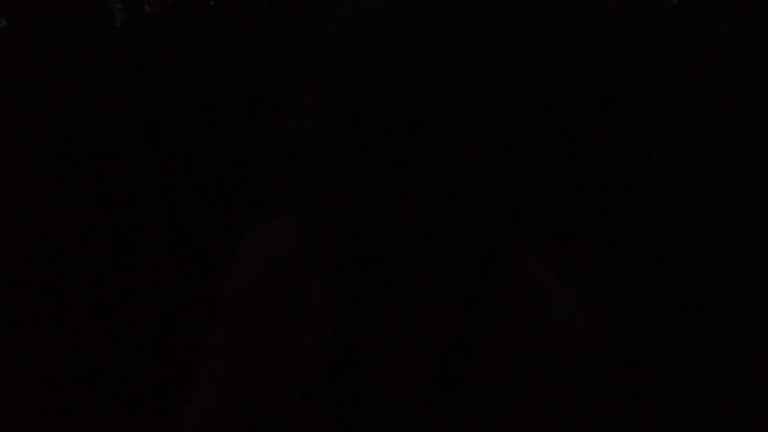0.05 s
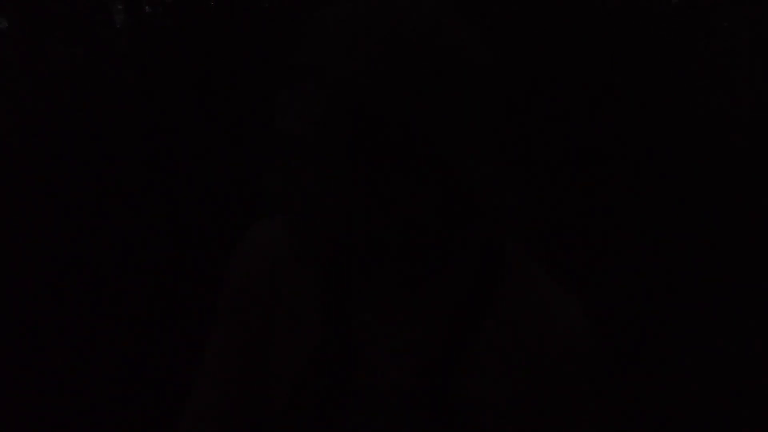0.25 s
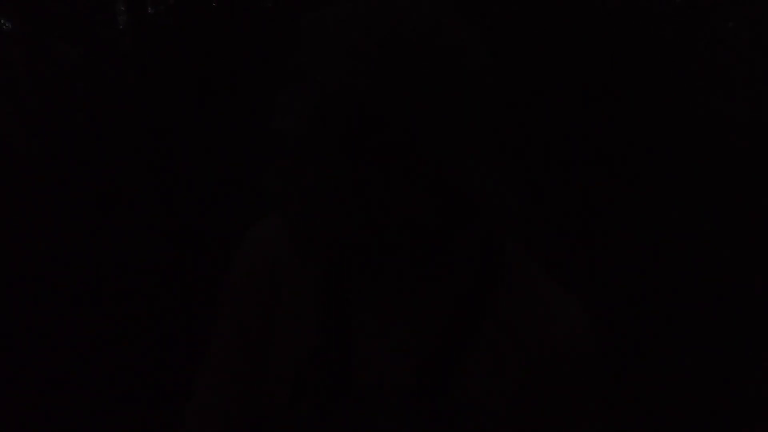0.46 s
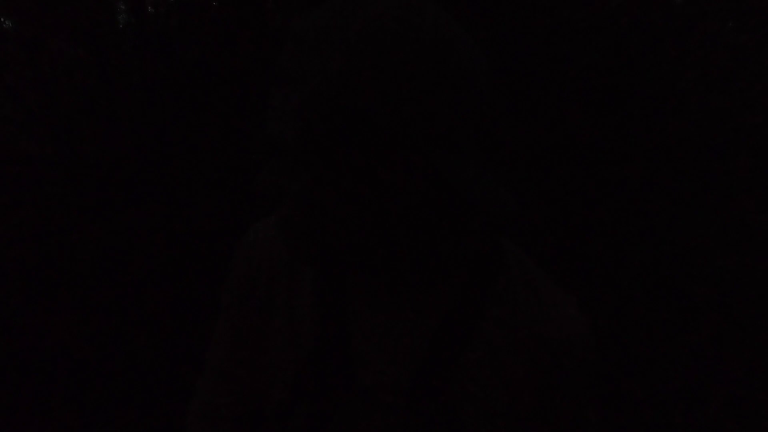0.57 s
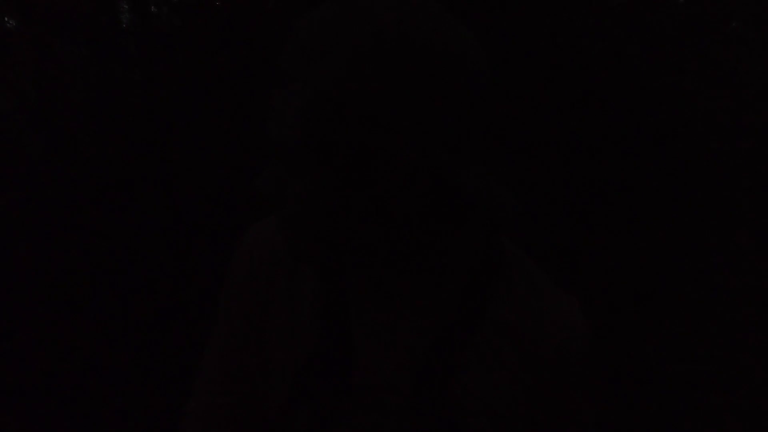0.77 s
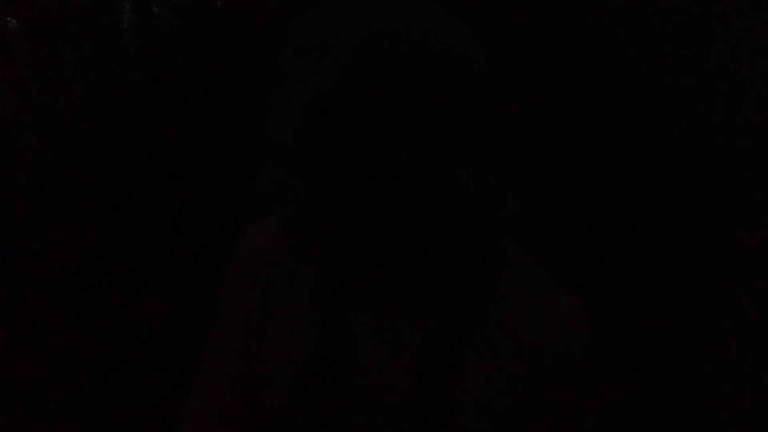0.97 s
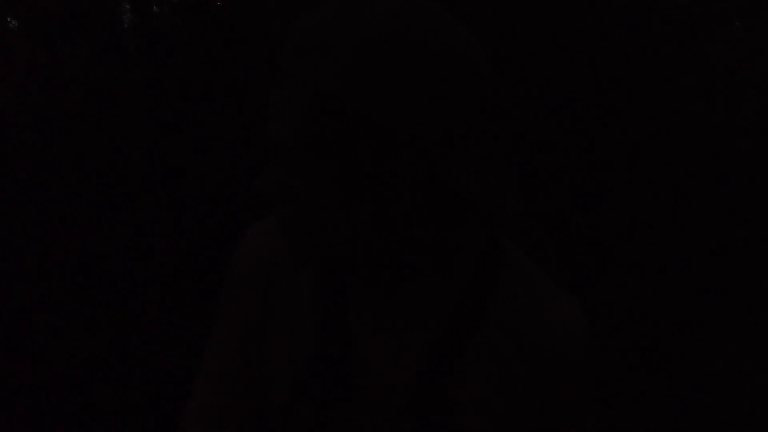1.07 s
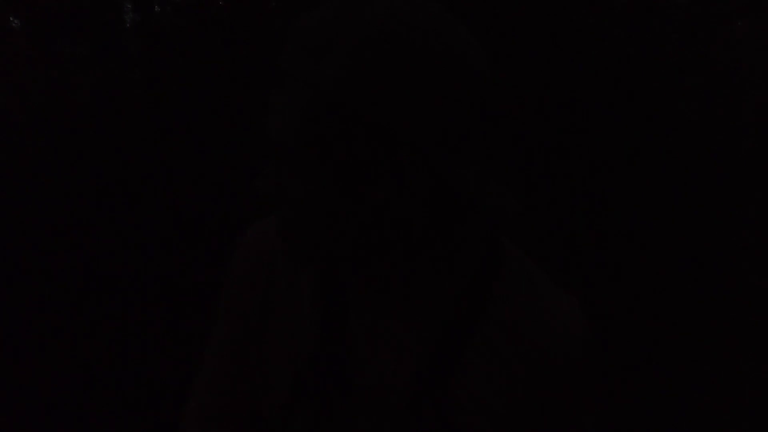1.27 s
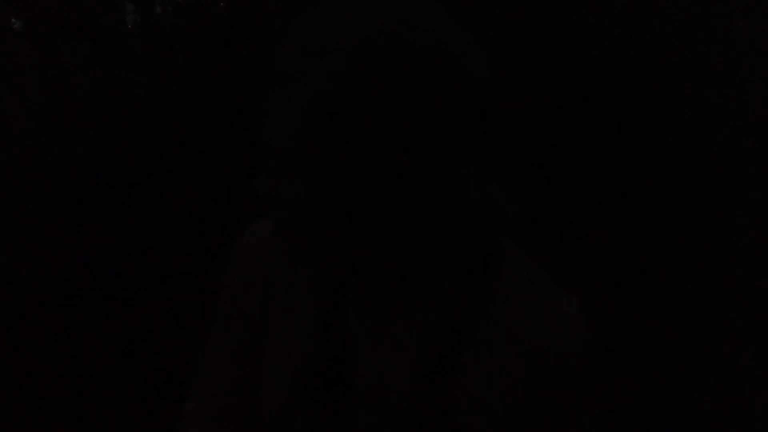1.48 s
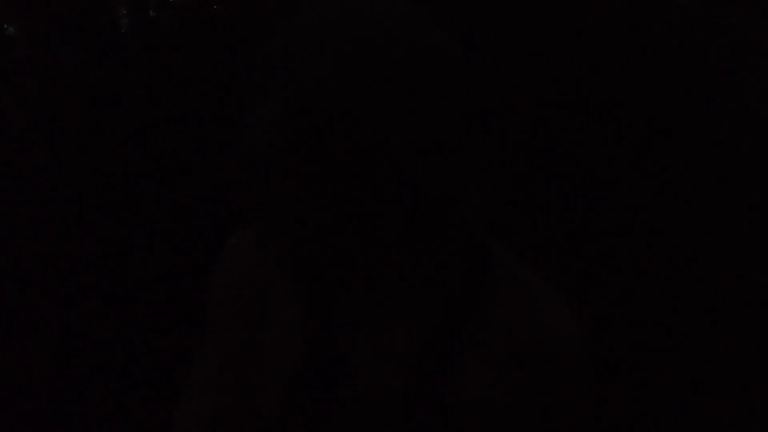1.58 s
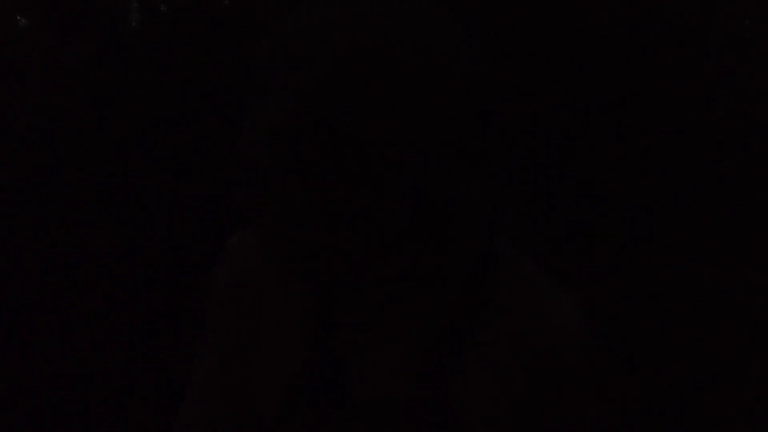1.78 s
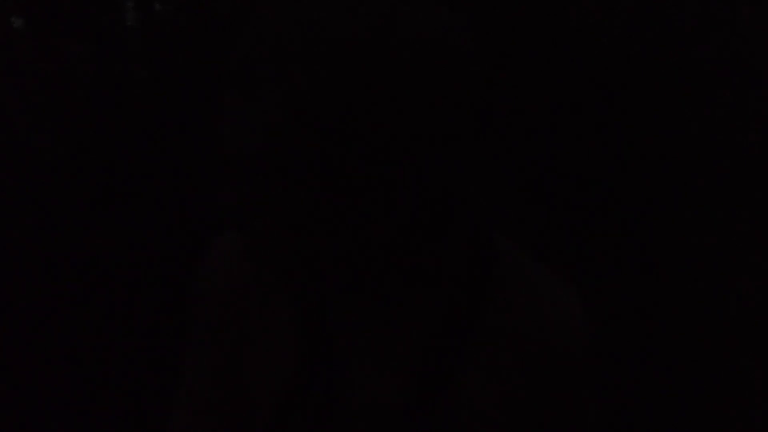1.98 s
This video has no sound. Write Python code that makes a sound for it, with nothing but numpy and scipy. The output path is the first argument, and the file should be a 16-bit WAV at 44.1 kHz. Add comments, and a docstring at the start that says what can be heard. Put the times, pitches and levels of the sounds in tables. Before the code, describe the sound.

Crickets at night outdoors: quick pulsing mid-high chirps close by, thin continuous insect trills all around

```python
"""Tree crickets chirp in the woods at night, about three times a second: runs of short wing strokes near 1.85 kHz.
Each stroke is a raspy tone that sags in pitch; farther singers are coloured noise swelling on a common beat.
Higher crickets trill without pause as stroke trains of arching pitch, over a distant chorus of coloured noise.
The near chirps and the trills are scattered by the trees, as dying noise echoes.
Beneath lie a far-off noise rumble, wavering hum tones, soft ringing bumps and small resonant noise ticks."""
import sys
import numpy as np
from scipy import signal
from scipy.fft import rfft, irfft
from scipy.io import wavfile

SR = 44100
rng = np.random.default_rng(int(sys.argv[2]) if len(sys.argv) > 2 else 0)


def pcm_store(signal):
    """Save signal as 16-bit PCM."""
    levels = np.round(np.clip(np.atleast_2d(signal), -1, 1) * 32767)
    wavfile.write(sys.argv[1], SR, levels.astype(np.int16).T)


N = 89831
T = np.arange(N) / SR   # time [s]

# Spectrum levels are relative: each noise is set to an rms of one before its own level is applied.
# Positive pan favours the left.

# High trilling crickets: (top pitch [Hz], level at the turning time [dB], stroke rate [1/s], pitch arch [Hz],
# pan [dB], scattered share [dB], turning time [s], fade away from that time [dB/s], negative = grows)
TRILLERS = [(5350, -64.5, 53, 200, 5, 0.5, 0.54, 14.5), (5660, -71.5, 34, 190, -1.5, 5.5, 1.2, 5.5),
            (6233, -70.5, 47.5, 350, 3, 4.5, 0.68, -0.5), (6330, -72.5, 54, 340, 7.5, 1, 0.61, -2),
            (6950, -75, 51, 400, -16.5, 2.5, 0.72, -1.5), (7710, -71, 49, 450, 14, 2, 0.91, 1.5),
            (7960, -66, 62, 330, -5.5, 3, 1.4, 0.5), (8560, -72.5, 25, 1200, -12.5, -8, 2.1, 10.5)]
# Colour of the distant trillers: (frequency [Hz], level [dB])
CHORUS_SPECTRUM = [(2500, -60), (4300, -30), (4950, -16.5), (5250, -8), (5750, -3), (6200, 0.5), (6700, -7),
                   (7200, -2.5), (7800, 1), (8100, -14.5), (8450, -8), (8750, -31.5), (9300, -52.5),
                   (11000, -68)]
# Colour of a very faint thin sizzle above the chorus: (frequency [Hz], level [dB])
SIZZLE_SPECTRUM = [(11000, -33.5), (11700, 3), (12100, 2), (12600, -11.5), (13000, -29.5)]
# Colour of the farther tree crickets: (frequency [Hz], level [dB])
BEAT_SPECTRUM = [(700, -52.5), (1300, -23.5), (1560, -10.5), (1690, -4), (1790, 2), (1920, -3.5),
                 (2040, -15.5), (2170, -26), (3000, -38), (3800, -37.5), (4200, -56), (8000, -100)]
# Colour of the night air: (frequency [Hz], level [dB])
RUMBLE_SPECTRUM = [(20, -15.5), (70, -9.5), (108, -10.5), (160, 1.5), (210, 2), (290, -9), (420, -16.5),
                   (650, -22), (1100, -24.5), (2300, -34.5), (2900, -25), (3500, -44.5), (4500, -40.5),
                   (8500, -63.5), (9500, -92.5)]
# Colour of the deepest rumble: (frequency [Hz], level [dB])
DEEP_SPECTRUM = [(10, -12), (35, 0), (70, -1.5), (110, -19), (200, -32), (1000, -100)]
# Course of the deepest rumble: (time [s], level [dB])
DEEP_LEVEL = [(0.0, -60.5), (0.66, -72), (0.75, -78.5), (0.82, -54), (0.88, -64), (1.53, -63), (1.57, -53),
              (1.72, -77), (1.75, -62.5), (2.03, -56)]
# Left-right likeness of all diffuse noise: (frequency [Hz], correlation [-1 to 1])
DIFFUSE_ALIKE = [(40, .93), (100, 0.95), (200, 0.5), (900, 0.41), (1700, 0.77), (3300, 0.45), (5200, 0.007),
                 (8000, 0.058)]
# Faint hum: (centre pitch [Hz], centre level [dB])
HUMS = [(168, -67.5), (212, -68.5)]
# Soft bumps: (time [s], level before attack and decay [dB], pitch [Hz], t60 [s])
BUMPS = [(.002, -44, 383, 0.051), (0.127, -41.5, 270, 0.062), (.131, -45, 416, 0.029),
         (0.279, -47, 164.6, 0.21), (0.809, -50, 46, 0.12), (1.538, -51.5, 418, 0.12),
         (1.552, -38.5, 165, 0.12), (1.582, -41, 145, 0.089), (2.01, -40, 150, 0.16)]
# Small ticks and rustles: (time [s], level before decay [dB], centre [Hz], width of each filter pass [Hz], t60 [s])
TICKS = [(.002, -54.5, 2700, 2260, 0.19), (0.125, -50, 2600, 300, 0.092), (0.13, -58, 3000, 5040, 0.18),
         (0.402, -67, 4600, 1500, 0.018), (1.453, -52.5, 4800, 484, 0.019), (1.979, -69, 1940, 2160, 0.43)]
# Stroke runs of the nearest tree crickets: (first stroke [s], length [s], stroke rate [1/s], first level [dB],
# fade over the run [dB], negative = grows, pitch [Hz], rasp against the tone [dB])
CHIRPS = [(.013, .055, 90, -45.5, 0.5, 1820, -36), (.066, .1, 85.4, -45, -5.5, 1867, -30),
          (0.183, 0.076, 72, -42, 6.5, 1814, -39), (.337, 0.084, 84.4, -46.5, -5.5, 1820, -33),
          (.448, 0.077, 91, -39, 12, 1884, -28.5), (0.51, 0.06, 93, -42.5, 5.5, 1860, -40),
          (.705, 0.077, 93, -44, -0.5, 1813, -29.5), (.792, 0.054, 82, -37.5, 6.5, 1885, -30),
          (.861, .08, 82, -46, -0.5, 1823, -41), (1.055, 0.097, 83, -41, -5, 1860, -30),
          (1.166, .055, 71, -40, 5, 1840, -42), (1.283, .08, 80, -47, 8, 1866, -41),
          (1.390, .101, 78.6, -41, -4.5, 1840, -29), (1.511, 0.099, 87.5, -42, 6, 1833, -37),
          (1.737, .116, 87, -43.5, -3.5, 1888, -28.5), (1.887, 0.048, 92, -42.5, -2, 1810, -44),
          (1.960, 0.059, 75, -40.5, 13.5, 1890, -42)]
# Colour of the scraping wing file: (frequency [Hz], level [dB])
RASP_SPECTRUM = [(900, -40.5), (1300, 6), (2200, 0), (3000, -5), (3800, 4), (4150, -18), (8000, -81.5)]

TRILL_DUTY = .62   # sounding share of each stroke cycle
TRILL_WAVER_HZ, TRILL_WAVER_DB, TRILL_SCATTER_T60_S = 30, 1.0, 0.16
CHORUS_DB, SIZZLE_DB, CHORUS_PAN_DB = -59, -99, -1.9
BEAT_FIRST_S, BEAT_PERIOD_S, BEAT_DEPTH_DB, BEAT_DB = 0.097, 0.352, 3.5, -53.5
RUMBLE_DB, RUMBLE_PAN_DB = -59, -2
HUM_WAVER_HZ, HUM_WAVER_DB = 14, 3
BUMP_ATTACK_S, BUMP_PAN_DB = 0.0023, -5
TICK_TOP_HZ = 7600
STROKE_S, STROKE_SAG_HZ = .0088, 40
STROKE_SPREAD_HZ, STROKE_SPREAD_DB, STROKE_JITTER_S = 12, 1.0, .0002   # chance from stroke to stroke
OCTAVE_DB, NEAR_PAN_DB = -48, 0.5   # second harmonic against the tone; left-right balance
WOODS_DB, WOODS_T60_S, WOODS_ALIKE = -15, 0.28, 0.9
LEFT_LAG_SAMPLES = 2
CUTOFF_HZ = 12600


def from_db(db):
    """Decibels to gain."""
    return 10 ** (np.asarray(db) / 20)


def rms_one(x):
    """Scale to an rms of one."""
    return x / np.sqrt(np.mean(x ** 2) + 1e-20)


def pan(db):
    """Left and right gains for a level difference."""
    return from_db(np.array([[db], [-db]]) / 2)


def at_hz(points, hz):
    """Read a table on a log-frequency axis."""
    f, value = np.transpose(points)
    return np.interp(np.log(hz + 1), np.log(f), value)


def drift(rate):
    """Slow random wander with an rms of one, from straight lines between 2 * rate knots a second."""
    knots = rng.standard_normal(1024)
    return rms_one(np.interp(T * rate * 2, np.arange(len(knots)), knots))


def stereo_noise(alike):
    """Spectra of left and right white noise whose shared and opposed parts set their likeness."""
    mid, side = rfft(rng.standard_normal((2, N)))
    alike = np.clip(alike, -1, 1)
    return np.sqrt(1 + alike) * mid + np.sqrt(1 - alike) * side * np.array([[1], [-1]])


def far_noise(spectrum):
    """Diffuse stereo noise of a given colour, rms one."""
    hz = np.fft.rfftfreq(N, 1 / SR)
    white = stereo_noise(at_hz(DIFFUSE_ALIKE, hz))
    return rms_one(irfft(white * from_db(at_hz(spectrum, hz)), N))


def trees(x, t60, alike):
    """Dense dying reflections from trunks and leaves, as convolution with decaying noise."""
    tail = irfft(stereo_noise(alike), N) * from_db(-60 * T / t60)
    return signal.fftconvolve(x[None], rms_one(tail) / np.sqrt(N), axes=1)[:, :N]


def trillers():
    """Unbroken trains of strokes, each an arch in pitch, smeared by the leaves; each singer slowly shifts in level."""
    out = np.zeros((2, N))
    for top_hz, db, rate, arch_hz, pan_db, scatter_db, turn_s, fade_db_per_s in TRILLERS:
        cycle = (rate * T + rng.random() + 0.067 * drift(3)) % 1   # slightly uneven stroke timing
        stroke = np.abs(np.sin(np.pi * np.minimum(cycle / TRILL_DUTY, 1)))
        pitch = top_hz + arch_hz * (stroke - 1) + TRILL_WAVER_HZ * drift(50)
        tone = np.sin(2 * np.pi * np.cumsum(pitch) / SR)
        song = stroke ** 1.5 * tone * from_db(TRILL_WAVER_DB * drift(8))
        scattered = from_db(scatter_db) * trees(song, TRILL_SCATTER_T60_S, 0)
        level = from_db(db - fade_db_per_s * np.abs(T - turn_s))
        out += level * pan(pan_db) * rms_one(song + scattered)
    return out


def distant_chorus():
    """Distant trills blurred into steady coloured noise, with a very faint sizzle on top."""
    trills = from_db(CHORUS_DB) * far_noise(CHORUS_SPECTRUM)
    sizzle = from_db(SIZZLE_DB) * far_noise(SIZZLE_SPECTRUM)
    return pan(CHORUS_PAN_DB) * (trills + sizzle)


def far_tree_crickets():
    """Many blurred chirps, as coloured noise, swell and fade together on the common beat."""
    beat = np.cos(2 * np.pi * (T - BEAT_FIRST_S) / BEAT_PERIOD_S)
    return from_db(BEAT_DB + BEAT_DEPTH_DB * beat) * far_noise(BEAT_SPECTRUM)


def night_air():
    """A steady low rumble of coloured noise, with a deeper layer that rises and falls."""
    rumble = from_db(RUMBLE_DB) * far_noise(RUMBLE_SPECTRUM)
    deep_level = from_db(np.interp(T, *np.transpose(DEEP_LEVEL)))
    return rumble + deep_level * far_noise(DEEP_SPECTRUM)


def hum():
    """Low sine tones that wander in pitch and level."""
    out = np.zeros(N)
    for hz, db in HUMS:
        level = from_db(db + HUM_WAVER_DB * drift(5))
        pitch = hz + HUM_WAVER_HZ * drift(8)
        out += level * np.sqrt(2) * np.sin(2 * np.pi * np.cumsum(pitch) / SR)   # root two: rms one
    return out


def bumps():
    """Soft knocks, each a decaying sine ringing briefly at one low pitch."""
    out = np.zeros(N)
    for start_s, db, hz, t60 in BUMPS:
        t = np.maximum(T - start_s, 0)
        attack = 1 - np.exp(-t / BUMP_ATTACK_S)
        out += from_db(db - 60 * t / t60) * attack * np.sin(2 * np.pi * hz * t)
    return pan(BUMP_PAN_DB) * out


def ticks():
    """Short dying bursts of noise, each filtered twice through one resonance."""
    out = np.zeros((2, N))
    for start_s, db, hz, width_hz, t60 in TICKS:
        b, a = signal.iirpeak(hz, hz / width_hz, fs=SR)
        grain = irfft(stereo_noise(0.66), N)
        for _ in range(2):
            grain = signal.lfilter(b, a, grain)
        decay = (T >= start_s) * from_db(db - 60 * np.maximum(T - start_s, 0) / t60)
        out += rms_one(grain) * decay
    return signal.sosfilt(signal.butter(4, TICK_TOP_HZ, fs=SR, output="sos"), out)


def tree_crickets():
    """Runs of wing strokes that grow or fade; each stroke is a short, slightly raspy tone that sags in pitch."""
    out, rasp = np.zeros(N), far_noise(RASP_SPECTRUM)[0]
    for start, length, rate, db, fade_db, hz, rasp_db in CHIRPS:
        chance = rng.standard_normal((24, 3))   # timing, pitch and level of each stroke
        phases = rng.uniform(0, 2 * np.pi, 24)
        for k in range(min(int(length * rate) + 1, len(phases))):
            t = T - (start + k / rate + STROKE_JITTER_S * chance[k, 0])   # zero at mid-stroke
            on = np.abs(t) < STROKE_S / 2
            t = t[on]
            # half the sag here: the pitch is the slope of the phase
            mean_hz = hz + STROKE_SPREAD_HZ * chance[k, 1] - STROKE_SAG_HZ * t / STROKE_S / 2
            phase = phases[k] + 2 * np.pi * t * mean_hz
            tone = np.sin(phase) + from_db(OCTAVE_DB) * np.sin(2 * phase)
            scrape = from_db(rasp_db) * rasp[on]
            level = db + STROKE_SPREAD_DB * chance[k, 2] - fade_db * k / (length * rate)
            out[on] += from_db(level) * np.cos(np.pi * t / STROKE_S) ** 2 * (tone + scrape)
    scattered = from_db(WOODS_DB) * trees(out, WOODS_T60_S, WOODS_ALIKE)
    return pan(NEAR_PAN_DB) * (out + scattered)


def from_the_right(pair):
    """The sound reaches the left side a little later."""
    return np.array([np.roll(pair[0], LEFT_LAG_SAMPLES), pair[1]])


def scene():
    """Crickets near and far over the night air; the trillers stand all around."""
    high = trillers() + distant_chorus()
    low = pan(RUMBLE_PAN_DB) * (night_air() + hum())
    return high + from_the_right(far_tree_crickets() + low + bumps() + ticks() + tree_crickets())


def record(dry):
    """A steep elliptic low-pass cuts off the top."""
    return signal.sosfilt(signal.ellip(10, .2, 70, CUTOFF_HZ, fs=SR, output="sos"), dry)


dry = scene()
out = record(dry)
pcm_store(out)
```